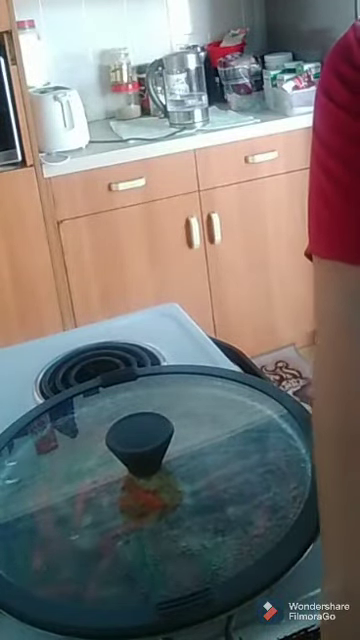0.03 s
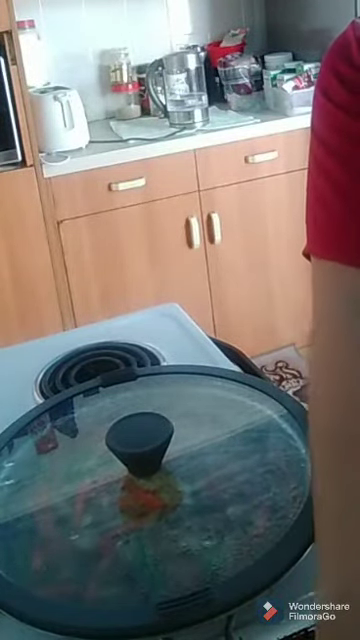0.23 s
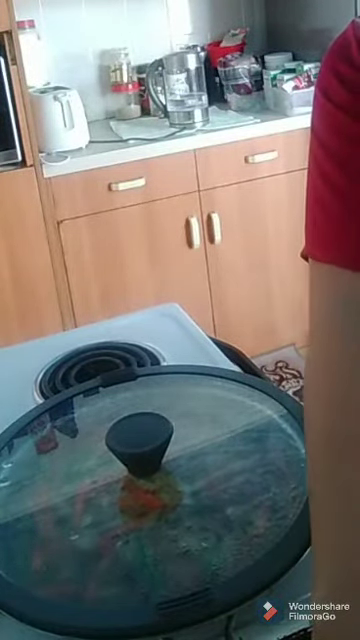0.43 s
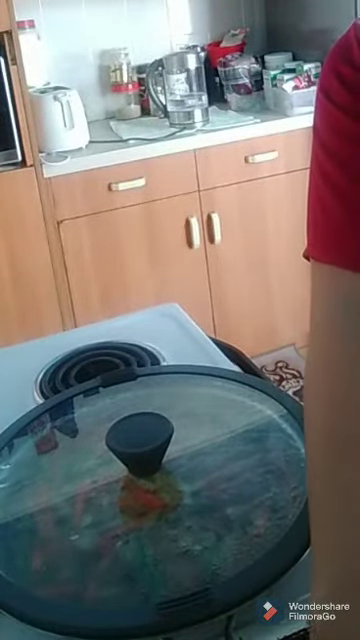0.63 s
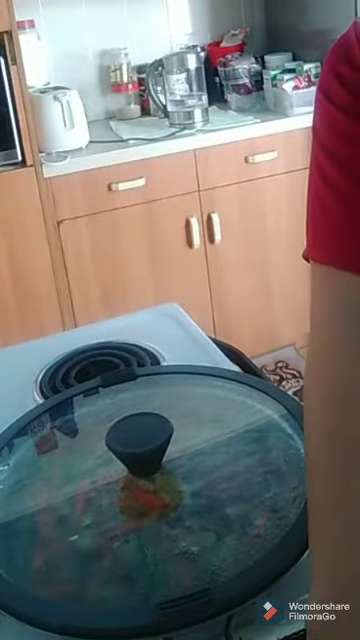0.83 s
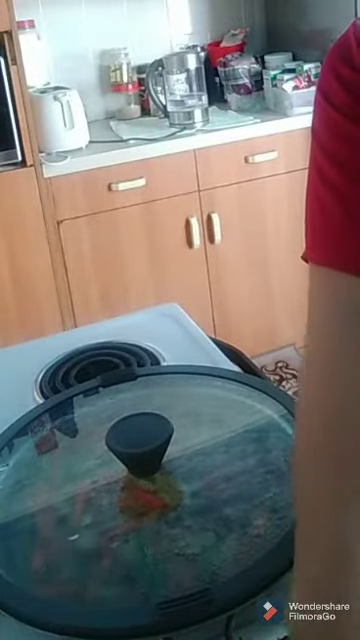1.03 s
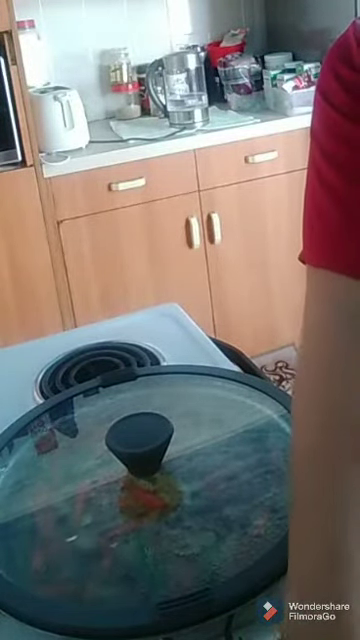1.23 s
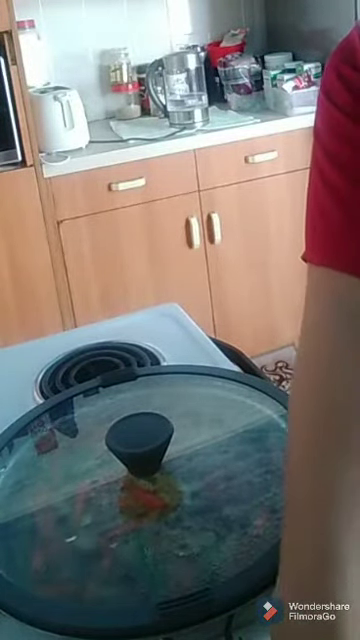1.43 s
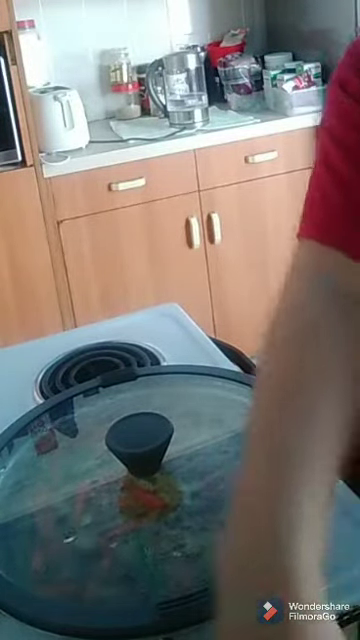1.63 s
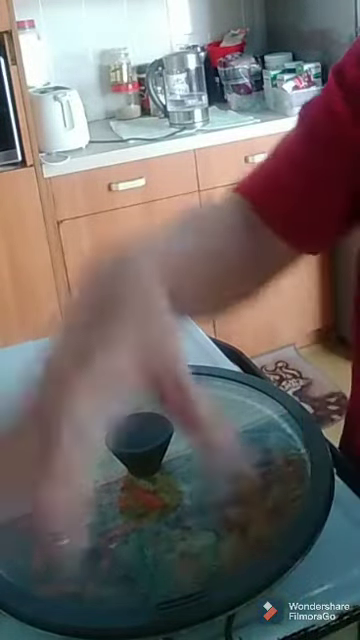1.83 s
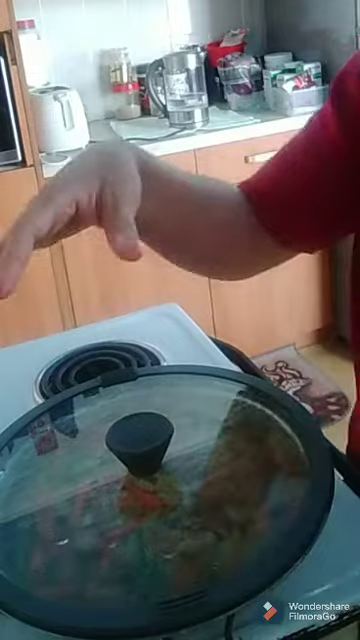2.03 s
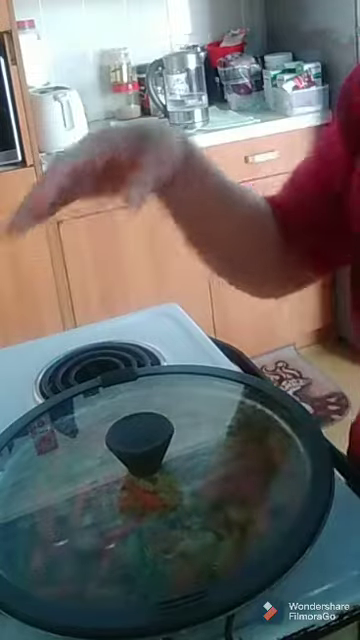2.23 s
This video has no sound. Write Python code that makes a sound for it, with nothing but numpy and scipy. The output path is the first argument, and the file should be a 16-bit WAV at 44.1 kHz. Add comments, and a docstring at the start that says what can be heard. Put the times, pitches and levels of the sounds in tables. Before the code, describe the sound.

Vegetables fry in a lidded pan, very close, in a small kitchen. Fine fizz and dry pops come irregularly, with a dull thump on the microphone around 0.15 s. The loudest snaps fall near 0.93 and 1.03 s, followed by a brief swell of sizzle. Wet bubbling sputters cluster around 1.6 s; after 1.9 s only sparse, weak ticks remain over soft room noise and faint hum.

```python
"""A small kitchen: vegetables fry under a glass lid, with fine crackle, sharp pops and wet sputters.
Shaped noise bursts make the pops, dense random grains the fizz and bubbling, damped rising tones the bubbles.
Damped modes of pan and lid ring with the food, and a short decaying room tail follows it.
Dull bumps push air against the close microphone, whose port colours the treble; soft low booms,
room noise and a faint appliance hum lie below."""
import sys
import numpy as np
from scipy import signal
from scipy.fft import rfft, irfft, next_fast_len
from scipy.io import wavfile

SR = 44100
rng = np.random.default_rng(int(sys.argv[2]) if len(sys.argv) > 2 else 0)


def wav_out(sig):
    """Save sig, one row per channel (or a flat mono array), as 16-bit PCM at SR to the path in sys.argv[1]."""
    wavfile.write(sys.argv[1], SR, np.round(np.clip(np.atleast_2d(sig).T, -1, 1) * 32767).astype(np.int16))


N = 101429  # length in samples


def amp(db):
    """Level law: the amplitude ratio is ten to the power of db / 20."""
    return 10 ** (np.asarray(db) / 20)


def decay(t, t60_s):
    """Exponential damping: the level falls 60 dB in each t60_s."""
    return amp(-60 * t / t60_s)


def unit(x):
    """Power normalisation: x scaled to rms 1."""
    return x / np.sqrt(np.mean(x ** 2) + 1e-20)


def along(points, hz):
    """Interpolation of (hz, value) points on a logarithmic frequency axis."""
    point_hz, values = np.transpose(points)
    return np.interp(np.log(hz + 1), np.log(point_hz + 1), values)


def shaped(x, level_db):
    """Minimum-phase filtering: a folded cepstrum gives the causal filter of gain level_db(hz)."""
    size = 2 * next_fast_len(N)
    cepstrum = irfft(np.log(amp(level_db(np.fft.rfftfreq(size, 1 / SR)))))
    cepstrum[1:size // 2] *= 2
    cepstrum[size // 2 + 1:] = 0
    response = np.exp(rfft(cepstrum))
    return irfft(rfft(x, size) * response)[:N]


def coloured(x, spectrum):
    """Spectral shaping at constant mean power gain, so that white input keeps its power."""
    def level_db(hz):
        curve_db = along(spectrum, hz)
        return curve_db - 10 * np.log10(np.mean(amp(curve_db) ** 2))
    return shaped(x, level_db)


def brightened(x, treble_db):
    """Crossover filtering: the band above 8 kHz is raised or lowered against the rest."""
    def band(kind):
        section = signal.butter(2, 8000, kind, fs=SR, output="sos")
        return signal.sosfilt(np.tile(section, (2, 1)), x)  # the section runs twice
    return band("low") + amp(treble_db) * band("high")


def add(track, start_s, sound):
    """Superposition: a sound is summed into the track from its start time."""
    part = track[max(round(start_s * SR), 0):][:len(sound)]
    part += sound[:len(part)]


def burst(envelope):
    """Impulsive noise under an envelope, with exactly the envelope's energy."""
    spikiness = 1.16  # an exponent above 1 breaks the noise into separate ticks
    noise = rng.standard_normal(len(envelope))
    spiky = envelope * np.sign(noise) * abs(noise) ** spikiness
    return spiky * np.linalg.norm(envelope) / np.linalg.norm(spiky)


def grains(per_s, scatter_db, smooth):
    """Shot noise: random ticks of scattered size over a share of smooth noise, at rms 1."""
    size = amp(scatter_db * np.minimum(rng.exponential(size=N), 4))
    struck = rng.random(N) < per_s / SR
    ticks = struck * size * rng.choice([-1, 1], N)
    return unit(unit(ticks) + smooth * rng.standard_normal(N))


def background():
    """Stationary noise: filtered room noise plus steady sine partials of an appliance hum."""
    # partials of the hum: pitch_hz, rms_level_db
    hum_partials = [(272, -75.5), (394, -69)]
    # spectrum of the room noise: frequency_hz, relative_level_db
    floor_spectrum = [(20, 8), (60, 2), (130, 4.5), (200, -4.5), (280, -2), (420, -7), (520, -9.5),
                      (1200, -15), (3000, -27), (16000, -28)]
    floor_db = -64
    t = np.arange(N) / SR
    hum = 0
    for hz, db in hum_partials:
        hum = hum + amp(db) * np.sqrt(2) * np.sin(2 * np.pi * (hz * t + rng.random()))
    return hum + amp(floor_db) * coloured(rng.standard_normal(N), floor_spectrum)


def kitchen(x):
    """Diffuse reverberation: decaying noise tails, cross-faded over time, each band with its own decay."""
    # reverberation of the room: frequency_hz, t60_s
    reverberation = [(100, 0.18), (1000, 0.29), (6000, 0.31), (16000, 0.41)]
    gap_s = 0.004  # delay before the tail
    out, t = np.zeros(N), np.arange(N) / SR
    centres_s = np.linspace(0, N / SR, 9)
    for centre_s in centres_s:
        hz, age, z = signal.stft(rng.standard_normal(SR // 2), SR, nperseg=256)
        damped = z * decay(age, along(reverberation, hz)[:, None])
        tail = signal.istft(damped, SR, nperseg=256)[1]
        # neighbouring shares overlap and add to constant power
        share = np.maximum(1 - abs(t - centre_s) / centres_s[1], 0) ** .5
        add(out, gap_s, signal.fftconvolve(x * share, tail / np.linalg.norm(tail)))
    return out


def booms():
    """Modal vibration: one damped low mode, likely of the stove top, sounds softly."""
    # soft low booms: start_s, level_db
    boom_table = [(.684, -41.5), (0.956, -48), (1.665, -54)]
    boom_hz, rise_s, t60_s = 121.4, 0.0056, 0.19
    out, t = np.zeros(N), np.arange(SR // 2) / SR
    ring = (1 - np.exp(-t / rise_s)) * decay(t, t60_s) * np.sin(2 * np.pi * boom_hz * t)
    for start_s, db in boom_table:
        add(out, start_s, amp(db) * ring)
    return out


def bumps():
    """Pressure relaxation: a step of air pressure leaks away and swings back, with a short dull knock."""
    # bumps on the microphone: start_s, pressure_step (linear scale factor), leak_s
    bump_table = [(.1520, 0.2, 0.044), (0.1926, 0.081, 0.09), (0.933, -0.013, 0.038),
                  (1.0319, -0.021, 0.064)]
    rise_s = 0.00024
    knock_hz, knock_t60_s, knock_db = 570, 0.0083, -9.5  # level relative to the step
    out, t = np.zeros(N), np.arange(SR) / SR
    knock = amp(knock_db) * decay(t, knock_t60_s) * np.sin(2 * np.pi * knock_hz * t)
    for start_s, step, leak_s in bump_table:
        push = (1 - t / leak_s) * np.exp(-t / leak_s)
        add(out, start_s, step * (1 - np.exp(-t / rise_s)) * (push + knock))
    return out


def pan(x):
    """Modal resonance: the food's sound drives damped modes of the pan and lid."""
    # modes of pan and lid: pitch_hz, gain_db, t60_s
    modes = [(491, -7.5, 0.13), (640, -2, 0.035), (715, -1.5, 0.083), (972, 0, 0.16), (1233, -4, 0.2),
             (1422, -0.5, 0.038), (2700, -39, 0.16), (4210, -1.5, 0.038), (5730, -8, 0.021),
             (6510, -5.5, 0.057)]
    t = np.arange(SR // 3) / SR
    ring = np.zeros(len(t))
    for hz, db, t60_s in modes:
        unit_gain = 2 * np.log(1000) / (t60_s * SR)  # gain near 1 at resonance
        ring += amp(db) * unit_gain * decay(t, t60_s) * np.cos(2 * np.pi * hz * t)
    return signal.fftconvolve(x, ring)[:N]


def bubble(hz, t60_s):
    """Bubble oscillation: a damped tone that starts at hz and rises slightly in pitch."""
    rise_s, glide_per_s = 0.00066, 4.4  # the pitch rises by twice the glide, as phase holds t squared
    t = np.arange(SR // 16) / SR
    tone = np.sin(2 * np.pi * hz * t * (1 + glide_per_s * t))
    return (1 - np.exp(-t / rise_s)) * decay(t, t60_s) * tone


def small_bubbles():
    """Random superposition of many bubbles of scattered pitch and size, at rms 1."""
    per_s, middle_hz, range_oct = 800, 1676, 2.28
    t60_cycles = 16.6  # higher bubbles die sooner
    out = np.zeros(N)
    for when, pitch, size in rng.random((int(per_s * N / SR), 3)):
        hz = middle_hz * 2 ** (range_oct * (pitch - .5))
        add(out, when * N / SR, size * bubble(hz, t60_cycles / hz))
    return unit(out)


def plops():
    """Bubble oscillation: the largest bubbles ring as separate damped tones."""
    # largest ringing bubbles: start_s, pitch_hz, level_db, t60_s
    plop_table = [(.647, 1160, -27, .018), (0.658, 931, -29, 0.048), (0.7571, 1140, -21, 0.014),
                  (0.9388, 1060, -29, 0.023), (1.0333, 1000, -19.5, 0.013), (1.577, 1156, -22.5, 0.021),
                  (1.5935, 1370, -25.5, 0.028), (1.594, 2750, -29.5, 0.025), (1.602, 1950, -31, .022),
                  (1.627, 585, -31, 0.025), (1.63, 1370, -29, 0.034), (1.638, 2090, -31, 0.022),
                  (1.645, 1700, -25, 0.024)]
    out = np.zeros(N)
    for start_s, hz, db, t60_s in plop_table:
        add(out, start_s, amp(db) * bubble(hz, t60_s))
    return out


def frying():
    """Modulated shot noise: fizz and bubbling rise and fall, and sputters add their power to both."""
    # changing simmer, the rise and fall of fizz and bubbling: time_s, fizz_db, bubbling_db
    simmer = [(0, -42.5, -49.5), (.14, -47.5, -52), (.22, -39.5, -48.5), (.31, -46.5, -51),
              (.40, -54, -50.5), (.46, -45.5, -54.5), (.53, -50, -53), (.60, -55, -56), (.64, -67, -51),
              (.73, -47.5, -44.5), (.86, -50, -54.5), (0.916, -50, -49), (.96, -42.5, -45),
              (1.01, -47.5, -50), (1.07, -36, -44), (1.2, -54, -49.5), (1.29, -56, -57), (1.38, -67, -57.5),
              (1.45, -57.5, -55.5), (1.5, -51, -43.5), (1.67, -39.5, -48.5), (1.78, -87, -59.5),
              (1.84, -56, -52), (1.92, -68.5, -67), (2.3, -68, -69)]
    # sputters: start_s, length_s, bubbling_db, fizz_db
    sputter_table = [(0.194, 0.025, -42, -33.5), (0.477, 0.016, -43, -39), (0.614, 0.074, -40, -44),
                     (0.758, 0.025, -40, -57), (0.809, 0.005, -40, -50), (0.8473, 0.01, -38, -41.5),
                     (0.878, 0.0077, -45.5, -43.5), (1.039, 0.021, -61, -35.5), (1.095, 0.037, -45.5, -40),
                     (1.239, 0.014, -45, -40), (1.307, 0.03, -52.5, -56.5), (1.409, 0.0077, -49, -55),
                     (1.466, 0.022, -54, -43), (1.502, 0.017, -41.5, -44), (1.578, 0.0043, -32.5, -46),
                     (1.592, 0.018, -38, -37), (1.621, 0.056, -37, -41), (1.722, 0.0044, -45.5, -31.5),
                     (1.806, 0.016, -41, -42), (1.843, 0.0045, -40.5, -45.5), (2.004, 0.0074, -54.5, -66),
                     (2.204, 0.026, -67, -59)]
    # spectrum of the fizz: frequency_hz, relative_level_db
    fizz_spectrum = [(100, -31), (500, -12), (1500, -9.5), (2700, 1), (4300, -1), (7500, -0.5), (10000, -2),
                     (13000, -5), (16000, -4)]
    # spectrum of the bubbling: frequency_hz, relative_level_db
    bubbling_spectrum = [(40, -46), (90, -16), (125, 0.5), (200, -12.5), (350, -7), (500, -2.5), (680, -1),
                         (820, -11), (1050, 1.5), (1400, -5), (2000, -1.5), (3200, -7.5), (6000, -23),
                         (16000, -17)]
    fall_s = 0.0036  # time constant at the end of a sputter

    t = np.arange(N) / SR
    times, fizz_db, bubbling_db = np.transpose(simmer)
    fizz = amp(np.interp(t, times, fizz_db))
    bubbling = amp(np.interp(t, times, bubbling_db))
    for start_s, length_s, low_db, high_db in sputter_table:
        flare = (t > start_s) * np.exp(-np.maximum(t - start_s - length_s, 0) / fall_s)
        fizz = np.hypot(fizz, amp(high_db) * flare)
        bubbling = np.hypot(bubbling, amp(low_db) * flare)

    fizz_noise = fizz * grains(per_s=1200, scatter_db=3.5, smooth=1)
    bubbling_noise = bubbling * grains(per_s=550, scatter_db=3, smooth=0.23)
    return (amp(-2.0) * coloured(fizz_noise, fizz_spectrum)
            + amp(-1.0) * coloured(bubbling_noise, bubbling_spectrum)
            + amp(-5.5) * bubbling * small_bubbles())


def pops():
    """Impulsive radiation: each bursting drop is a snap and crack, a fading spray and a duller body."""
    # sharp pops: start_s, crack_db, body_db, treble_db (levels before the common gains below)
    pop_table = [(0.0488, -30, -35, 4), (0.055, -22.5, -56, 3.5), (0.0594, -19, -36.5, -4),
                 (0.1042, -19.5, -35, 3.5), (0.1261, -21, -41, 0), (0.1512, -9.5, -17.5, 3.5),
                 (0.1721, -15, -33, -3), (0.191, -39, -22, 3), (0.2081, -19.0, -33, 1),
                 (0.2481, -19, -46, -3), (0.324, -20, -53, -2), (0.365, -26, -41.5, -0.5),
                 (0.3992, -38.5, -36, 12.5), (0.4221, -23, -42, -10), (0.4362, -19, -43, -3),
                 (0.4726, -17.5, -48, 3), (0.5539, -22.5, -57.0, -4), (0.6212, -27, -43, 0),
                 (0.6484, -17.0, -49.0, -5), (0.6601, -24, -36.5, -1), (0.712, -25.0, -62.5, 2.5),
                 (0.7573, -14, -34, -4.5), (0.7759, -17, -35, 5.5), (0.8158, -20, -32.5, 3),
                 (0.8205, -23.5, -52, 2), (0.9311, -6.5, -26.5, -2.5), (0.9372, -14.0, -33.5, 1),
                 (1.0177, -17.5, -54, 6.5), (1.0332, -5, -25.0, -5.5), (1.102, -29, -38.5, 2),
                 (1.137, -19.5, -51, 1), (1.1548, -14, -31, 2), (1.2762, -27.5, -39, -2),
                 (1.316, -21, -46, -3.5), (1.3973, -27.5, -41.5, -24), (1.471, -26.0, -42, -1),
                 (1.4807, -27.5, -38, 8), (1.5119, -13, -59, 2.5), (1.5654, -31, -35.5, 6),
                 (1.5795, -23.0, -47, 0), (1.6065, -23.5, -32, 3), (1.6248, -22, -36, -3),
                 (1.666, -23, -46, 6), (1.7269, -21, -33, -12), (1.8649, -33.5, -41, 0),
                 (1.9817, -32, -49, -9), (2.1298, -37, -58, -1)]
    # spectrum of the cracks: frequency_hz, relative_level_db
    crack_spectrum = [(100, -18.5), (400, -12), (1000, -3.5), (2000, -5.5), (3200, 0.5), (7500, -0.5),
                      (10000, -1.5), (13000, 1), (16000, 2)]
    # spectrum of the bodies: frequency_hz, relative_level_db
    body_spectrum = [(40, -27), (150, -10.5), (300, -10), (500, 3), (800, -10.5), (1000, 4), (1500, 3.5),
                     (2100, 5.5), (3200, -8.5), (6000, -5.5), (16000, -26)]
    crack_gain_db, body_gain_db, rise_s = -9, 2, 0.00019
    snap_db, snap_t60_s = 2, 0.00068  # the first instant of a pop
    spray_db, spray_t60_s = -7.5, 0.055  # the fine spray that follows
    crack_t60_s, body_t60_s = 0.0067, 0.019

    cracks, bodies, t = np.zeros(N), np.zeros(N), np.arange(SR // 8) / SR
    rise = 1 - np.exp(-t / rise_s)
    snap = amp(snap_db) * decay(t, snap_t60_s)
    spray = amp(spray_db) * decay(t, spray_t60_s)
    crack_shape = snap + rise * (decay(t, crack_t60_s) + spray)
    body_shape = rise * decay(t, body_t60_s)
    for start_s, crack_db, body_db, treble_db in pop_table:
        crack = brightened(burst(crack_shape), treble_db)
        add(cracks, start_s, amp(crack_db + crack_gain_db) * crack)
        add(bodies, start_s, amp(body_db + body_gain_db) * burst(body_shape))
    return coloured(cracks, crack_spectrum) + coloured(bodies, body_spectrum)


def scene():
    """Superposition: food, ringing pan and room tail, plus bumps, booms and background."""
    food = pops() + frying() + plops()
    ringing = food + pan(food)
    in_room = ringing + amp(-10.5) * kitchen(ringing)
    mix = amp(-2.5) * in_room + bumps() + booms() + background()
    return mix[None]


def record(dry):
    """Transducer response: port resonances lift the treble, and a steep low-pass sets the band limit."""
    # microphone resonances: centre_hz, width_hz, gain_db
    resonances = [(6467, 1120, 10), (14940, 1900, 5)]
    top_hz = 15900

    def port_db(hz):
        return sum(db / (1 + (2 * (hz - centre) / width) ** 2) for centre, width, db in resonances)

    x = shaped(dry[0], port_db)
    low_pass = 1 / (1 + (np.fft.rfftfreq(2 * N, 1 / SR) / top_hz) ** 160)
    return irfft(rfft(x, 2 * N) * low_pass)[None, :N]


dry = scene()
out = record(dry)
wav_out(out)
```